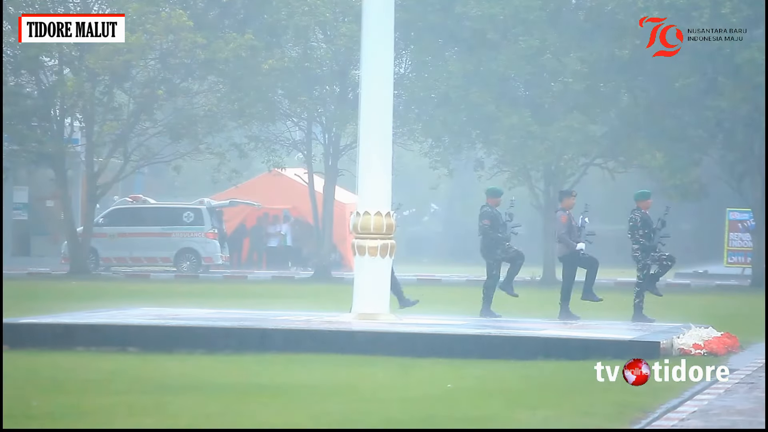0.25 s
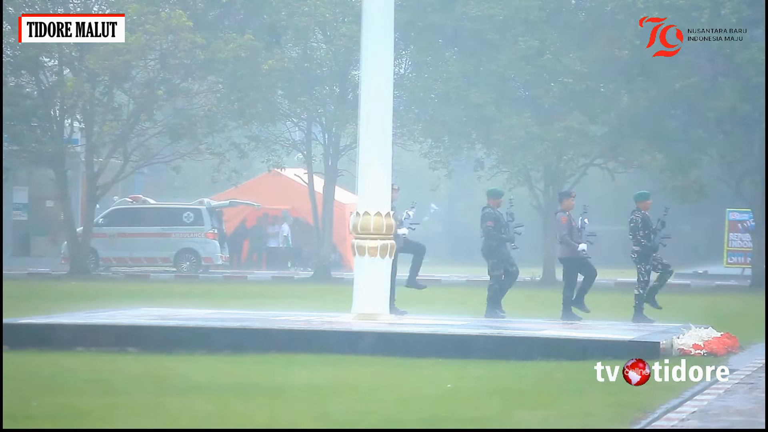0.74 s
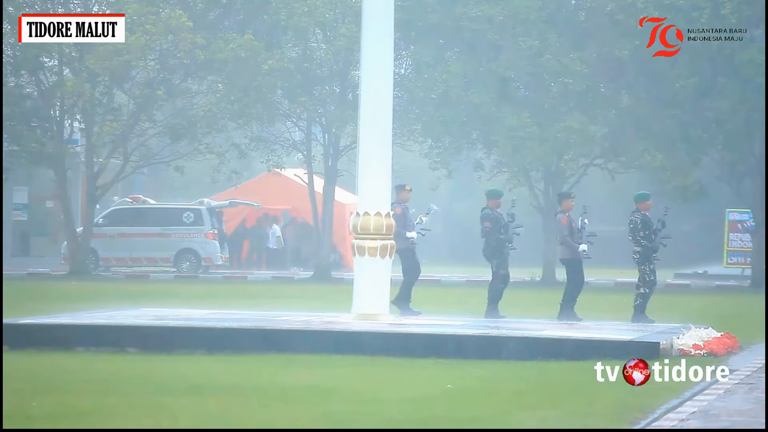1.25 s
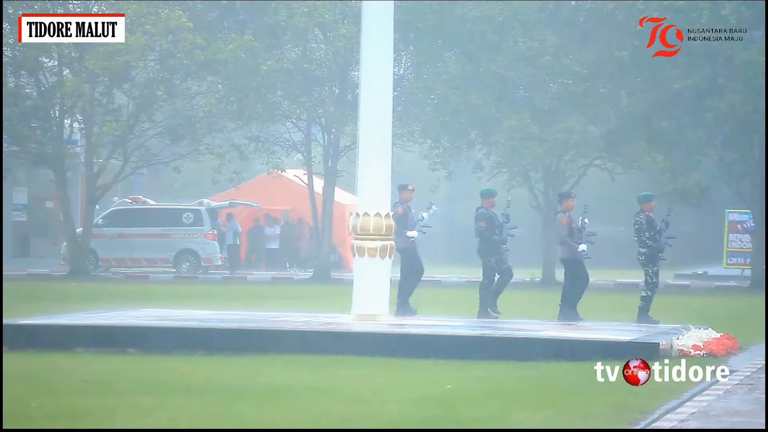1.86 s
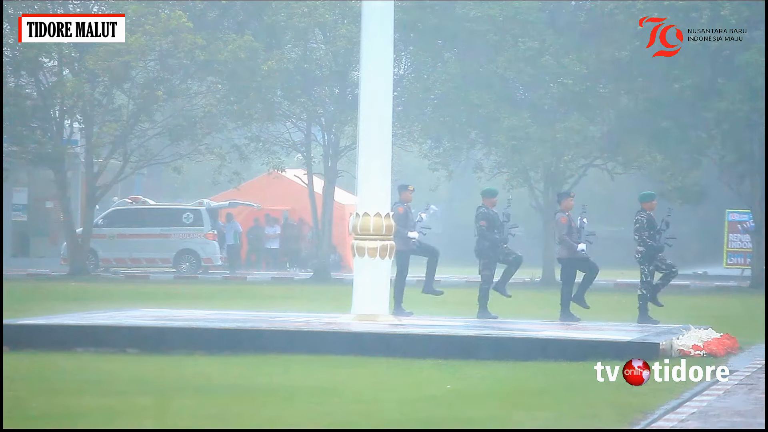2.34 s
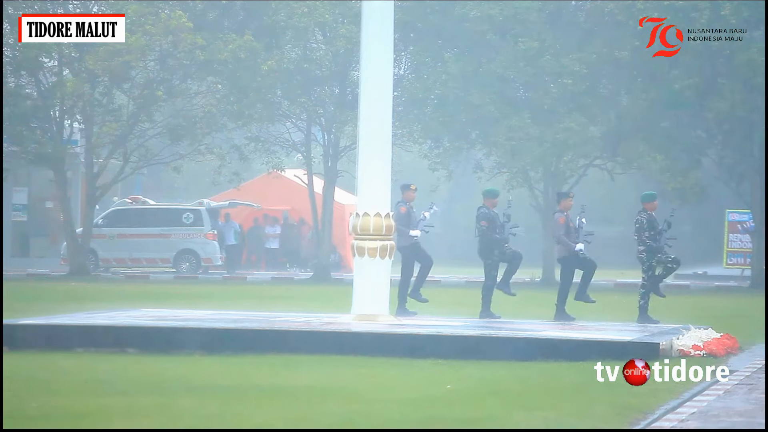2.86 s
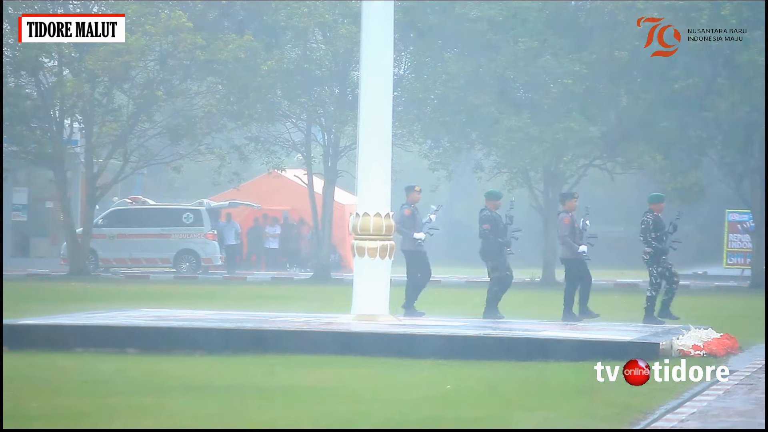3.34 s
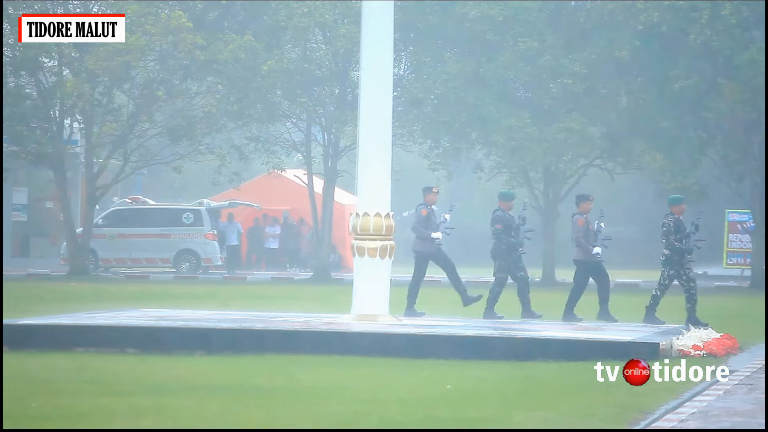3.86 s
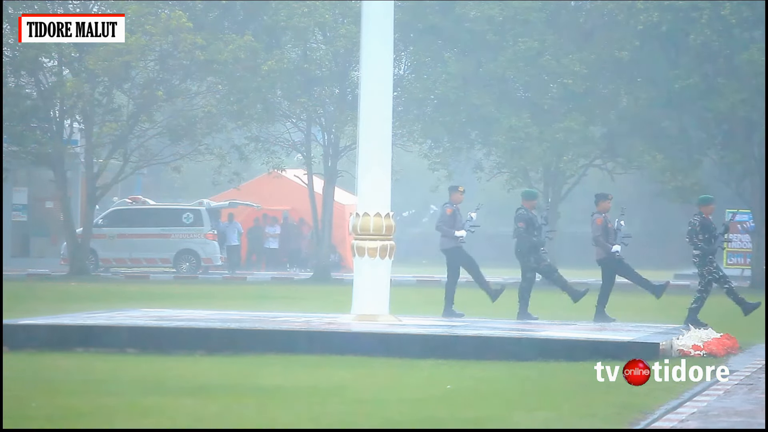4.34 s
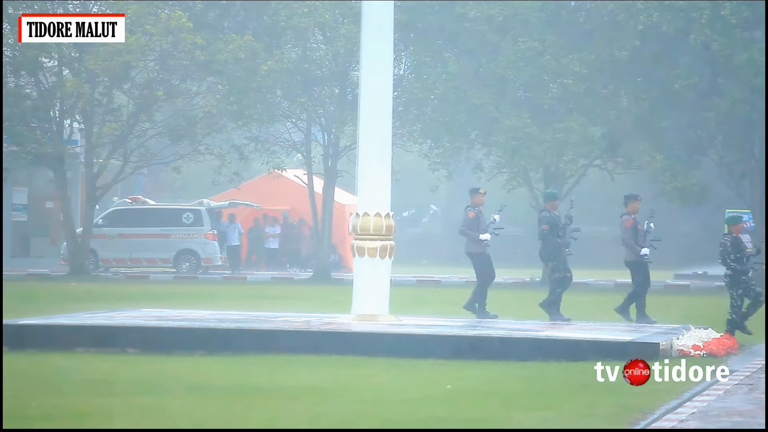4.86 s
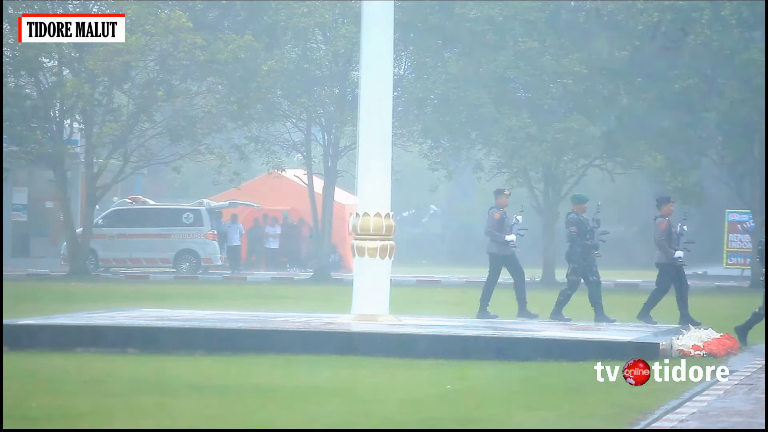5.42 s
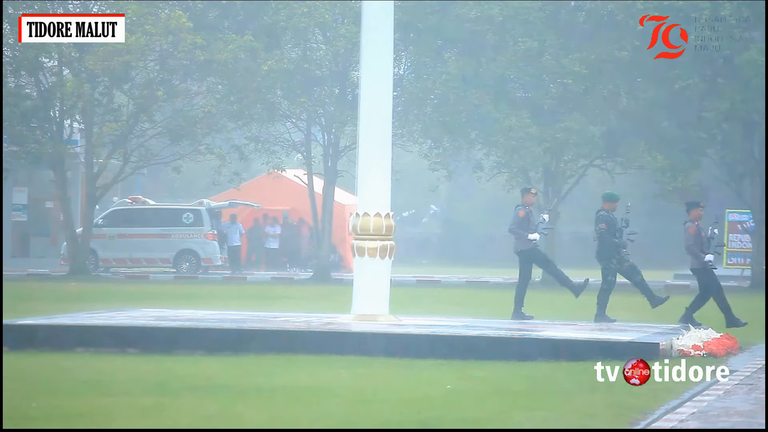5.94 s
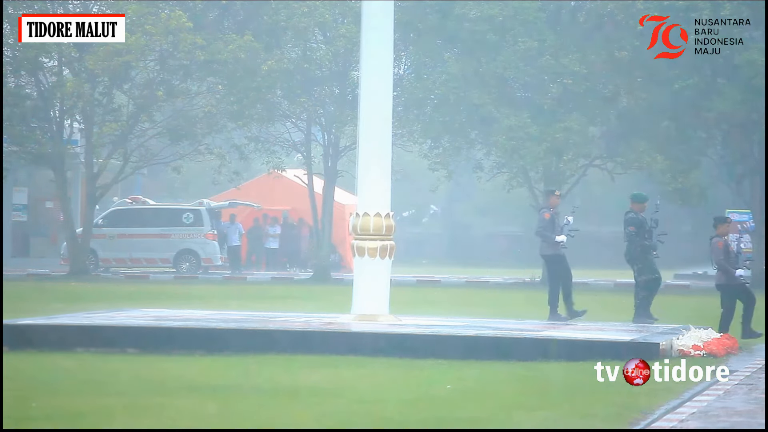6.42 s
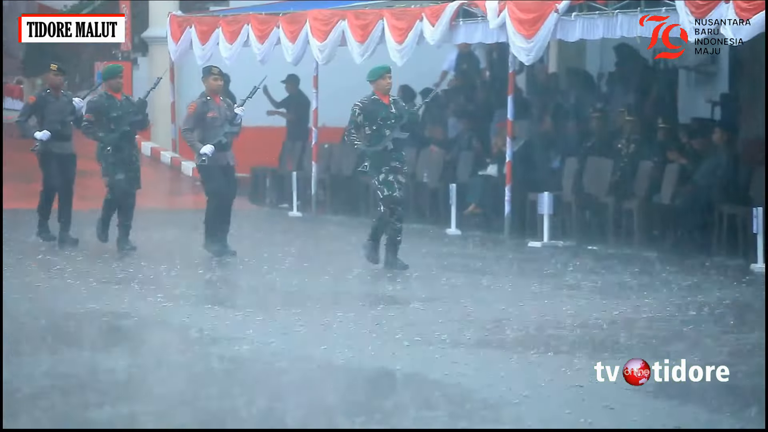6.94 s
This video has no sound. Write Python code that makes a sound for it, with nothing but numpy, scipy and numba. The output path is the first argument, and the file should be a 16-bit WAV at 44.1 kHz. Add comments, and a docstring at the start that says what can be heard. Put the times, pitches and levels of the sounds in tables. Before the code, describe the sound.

After two faint dull knocks, a dense downpour hisses and spatters, drops out abruptly for most of a second, then resumes a little stronger.

```python
"""First two dull knocks on the camera, at once inside the roar of a tropical downpour on a parade lawn,
heard from under a canvas shelter. Far drops are wavering noise; nearer ones spatter as short grains;
a few tick as single rings right by the microphone, over a steady low rumble of filtered noise.
The sound feed drops out for most of a second and returns a little louder."""
import sys
import numpy as np
from scipy import signal
from scipy.fft import rfft, irfft, next_fast_len
from scipy.io import wavfile
from scipy.ndimage import uniform_filter1d
from numba import njit

SR = 44100
rng = np.random.default_rng(int(sys.argv[2]) if len(sys.argv) > 2 else 0)


def wav_record(signal):
    """Record a signal, one row per channel, as 16-bit PCM in the file named by sys.argv[1]."""
    frames = np.transpose(np.atleast_2d(signal))
    bounded = np.clip(frames, -1, 1)
    # unit amplitude maps onto the largest positive 16-bit level
    quanta = np.round(bounded * 32767).astype(np.int16)
    wavfile.write(sys.argv[1], SR, quanta)


N = 316638  # length in samples


def undb(db):
    """Decibels to gain."""
    return 10 ** (np.asarray(db) / 20)


def along_hz(table, hz):
    """Read a (frequency [Hz], level [dB]) table on a log-frequency axis."""
    table_hz, db = np.transpose(table)
    return np.interp(np.log(np.maximum(hz, 1)), np.log(table_hz), db)


def colour(x, table, size=4096):
    """Causal minimum-phase filter with the table's spectrum, built from the folded cepstrum."""
    spectrum = undb(along_hz(table, np.fft.rfftfreq(size, 1 / SR)))
    cepstrum = irfft(np.log(spectrum))
    cepstrum[1:size // 2] *= 2
    cepstrum[size // 2 + 1:] = 0
    impulse = irfft(np.exp(rfft(cepstrum)))
    return signal.fftconvolve(x, impulse)[:N]


def walk(rate):
    """Random levels held 1 / rate s and smoothed twice; their spread is a little under 1."""
    hold = int(SR / rate)
    steps = np.repeat(rng.standard_normal(N // hold + 1), hold)
    return uniform_filter1d(uniform_filter1d(steps, hold), hold)[:N]


@njit
def rings(length, start, hz, cycles, size):
    """Each grain is a sine that swells at once and dies over a few cycles."""
    out = np.zeros(length)
    for k in range(len(start)):
        step = hz[k] / SR
        for i in range(min(int(6 * cycles[k] / step), length - start[k])):
            age = i * step / cycles[k]
            envelope = np.e * 2 * age * np.exp(-2 * age)
            out[start[k] + i] += size[k] * envelope * np.sin(2 * np.pi * i * step)
    return out


def knocks(table, cycles):
    """Single blows from (time [s], peak [dB], pitch [Hz]) rows; the envelope peaks at the given time."""
    s, db, hz = np.transpose(table)
    start = (s * SR - cycles * SR / hz / 2).clip(0).astype(int)
    return rings(N, start, hz, np.full(len(s), cycles), undb(db))


def wavering_noise(swell_db, flicker_db, flicker_rate):
    """White noise whose half-octave bands swell together and flicker each on its own."""
    size = next_fast_len(N)
    octave = np.log2(np.maximum(np.fft.rfftfreq(size, 1 / SR), 1) / 25)  # octaves above 25 Hz
    white = rfft(rng.standard_normal(size))
    out, swell = 0, walk(4.02)
    for centre in np.arange(0, 10, .5):
        # neighbouring bands cross-fade and sum to the whole
        band = np.cos(np.pi * np.clip(octave - centre, -.5, .5)) ** 2
        waver_db = swell_db * swell + flicker_db * walk(flicker_rate)
        out = out + irfft(white * band, size)[:N] * undb(waver_db)
    return out / out.std()


# Spectrum of the low rumble: (frequency [Hz], relative level per Hz [dB])
RUMBLE_COLOUR = [(30, -22), (70, -3), (130, 1), (300, -19.5), (1000, -47.5)]


def low_rumble():
    """Steady white noise, filtered down to its lows."""
    rumble = colour(rng.standard_normal(N), RUMBLE_COLOUR)
    return undb(-45.5) * rumble / rumble.std()


# Dull knocks on the camera: (time [s], level before the body's own [dB])
CAMERA_KNOCKS = [(.0045, -16), (.025, -16)]
# What the camera body rings with: (frequency [Hz], level added to the knock [dB])
BODY_MODES = [(200, -1.5), (330, -5), (87, -9.5), (53, -9.5)]


def camera_thumps():
    """Each knock sets off all the body's resonances at once, and they die quickly."""
    blows = [(s, db + mode_db, hz) for s, db in CAMERA_KNOCKS for hz, mode_db in BODY_MODES]
    return knocks(blows, cycles=1.5)


# Drops beside the microphone: (time [s], peak of the main ring [dB], pitch [Hz])
CLOSE_DROPS = [(.1056, -14, 3230), (.164, -15, 3660), (.3785, -11, 4910), (.4288, -10, 6850),
               (.6856, -14, 3270), (1.3488, -6.5, 4350), (1.3959, -13, 4390), (1.5353, -12, 5940),
               (1.5775, -8.5, 5940), (3.9791, -8, 6290), (4.9456, -12, 3960), (5.1305, -13, 4740),
               (5.384, -11, 4120), (5.7395, -10, 4870), (6.2615, -13, 4860), (6.8347, -11, 5340)]


def close_ticks():
    """Each drop rings a few cycles, with a weaker overtone at 1.65 times its pitch."""
    overtones = np.array(CLOSE_DROPS) * (1, 1, 1.65)
    return knocks(CLOSE_DROPS, cycles=1.8) + undb(-11) * knocks(overtones, cycles=2.2)


def roar():
    """Far drops, too many to tell apart, merge into noise that wavers only a little."""
    return wavering_noise(swell_db=-0.77, flicker_db=0.74, flicker_rate=12)


def spatter(count, low_hz, high_hz, cycles, scatter_db, most_db):
    """Nearer drops: short grains of random pitch, mostly small, a few larger up to a biggest drop."""
    when, pitch, long, big = rng.random((count, 4)).T
    hz = low_hz * (high_hz / low_hz) ** pitch
    db = most_db * np.tanh(-scatter_db * np.log(1 - big) / most_db)
    size = undb(db) * hz / low_hz  # higher grains are stronger
    out = rings(N, (when * N).astype(int), hz, cycles * (.5 + long), size)
    return out / out.std()


# Brief thickenings of the spatter: (time [s], rise [dB])
FLURRIES = [(.42, 1), (.84, 3), (1.4, 3.5), (1.58, 3), (3.97, 2), (5.41, 6), (6.78, 3.5)]


def splash_level_db(t, pour_db):
    """Splashes against the roar: they lag as the rain swells, come in patches and thicken in flurries."""
    half_length_s = .04
    flurry_db = sum(db * np.exp(-((t - s) / half_length_s) ** 2) for s, db in FLURRIES)
    # -7 dB when the pour is at -19.5 dB, falling 0.36 dB per dB of swell
    lag_db = -7 - 0.36 * (pour_db + 19.5)
    return lag_db + flurry_db + .7 * walk(4)


# Loudness of the downpour: (time [s], level [dB])
POUR_LEVEL = [(0.05, -23.5), (0.22, -20.5), (0.48, -23), (.75, -21.5), (1.1, -20.5), (1.35, -20),
              (1.62, -20.5), (2.58, -18.5), (3.4, -17), (3.8, -17.5), (4.14, -18.5), (4.5, -18.5),
              (4.9, -18.5), (5.3, -17.5), (5.6, -17), (6.0, -18), (6.5, -18.5), (7.15, -17)]
# Spectrum of the rain: (frequency [Hz], relative level per Hz [dB])
RAIN_COLOUR = [(30, -28.5), (119, -7.5), (190, -6), (250, -3), (650, -1), (1150, -2), (1700, -4.5),
               (2500, -8), (5700, -11), (7300, -16), (8500, -16), (10700, -26.5), (14500, -35.5),
               (15600, -43)]
# Patchy noise in opposite sign left and right: (frequency [Hz], level against the roar [dB])
SIDE_COLOUR = [(30, -17), (110, -22), (200, -31), (380, -37), (700, -42), (1290, -33), (2380, -27),
               (4400, -21), (8120, -18.5), (15000, -12)]


def downpour():
    """Roar and spatter share one colour; a fainter, patchy noise flickers strongly band by band."""
    t = np.arange(N) / SR
    pour_db = np.interp(t, *np.transpose(POUR_LEVEL))
    splash_db = splash_level_db(t, pour_db)
    splash = spatter(count=16000, low_hz=3000, high_hz=14000, cycles=1.5, scatter_db=3, most_db=16)
    drum = spatter(count=6000, low_hz=300, high_hz=3000, cycles=1.2, scatter_db=2.5, most_db=12)
    rain = colour(roar() + undb(splash_db) * splash + undb(-15.5) * drum, RAIN_COLOUR)
    patchy = wavering_noise(swell_db=1.5, flicker_db=6, flicker_rate=20)
    side = colour(colour(patchy, RAIN_COLOUR), SIDE_COLOUR)
    gain = undb(pour_db) / rain.std()
    return gain * rain, gain * side


# Tilt between the channels: (frequency [Hz], left minus right [dB])
CHANNEL_TILT = [(60, -.8), (150, 0), (1500, 0), (3200, -.5), (5400, -1.4), (7500, -.9), (9600, -1.2),
                (12500, 0)]


def stereo(mid, side):
    """Both channels share mid, a little brighter on the right; side enters them in opposite sign."""
    size = next_fast_len(N)
    tilt = undb(along_hz(CHANNEL_TILT, np.fft.rfftfreq(size, 1 / SR)) / 2)  # half to each channel
    spectrum = rfft(mid, size)
    left = irfft(spectrum * tilt, size)[:N]
    right = irfft(spectrum / tilt, size)[:N]
    return np.array([left + side, right - side])


def scene():
    """The downpour over its rumble, with close ticks and camera knocks, in stereo."""
    rain, side = downpour()
    return stereo(rain + low_rumble() + close_ticks() + camera_thumps(), side)


# The feed is silent between: (start [s], end [s])
DROPOUT = (1.6796, 2.5202)
# Small electrical offset once the feed is back: (left [full scale], right [full scale])
RETURN_OFFSET = (.002, 0.0029)


def record(dry):
    """The feed cuts out and in abruptly; a steep elliptic low-pass takes off the top."""
    t = np.arange(N) / SR
    before = dry * (t < DROPOUT[0])
    after = (dry + np.array(RETURN_OFFSET)[:, None]) * (t > DROPOUT[1])
    top_hz = 15700
    lowpass = signal.ellip(14, .2, 80, top_hz, fs=SR, output="sos")
    return signal.sosfilt(lowpass, before + after)


dry = scene()
out = record(dry)
wav_record(out)
```